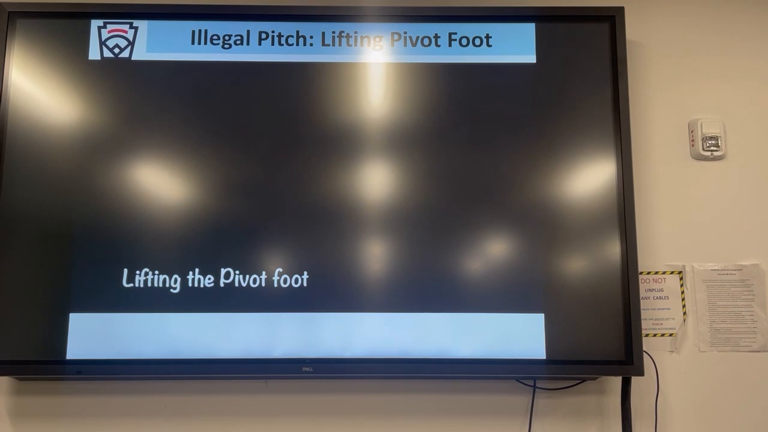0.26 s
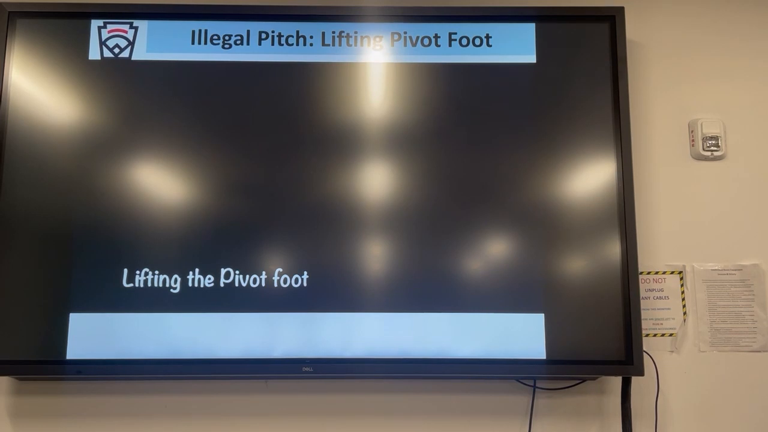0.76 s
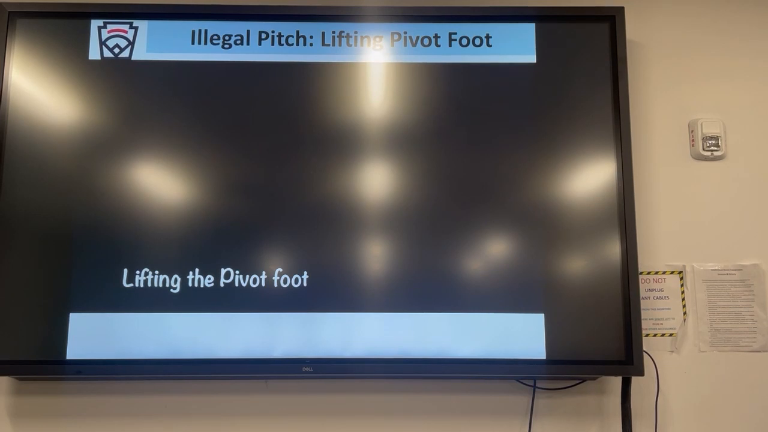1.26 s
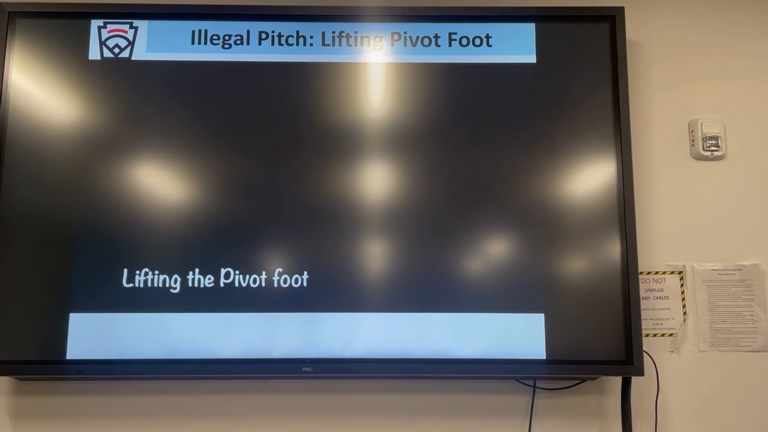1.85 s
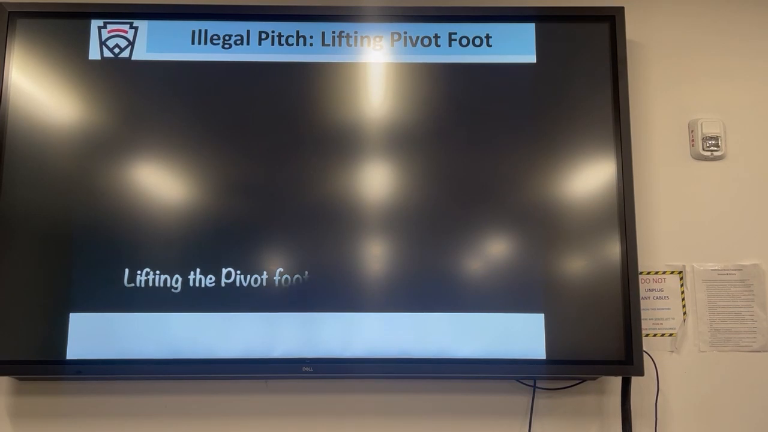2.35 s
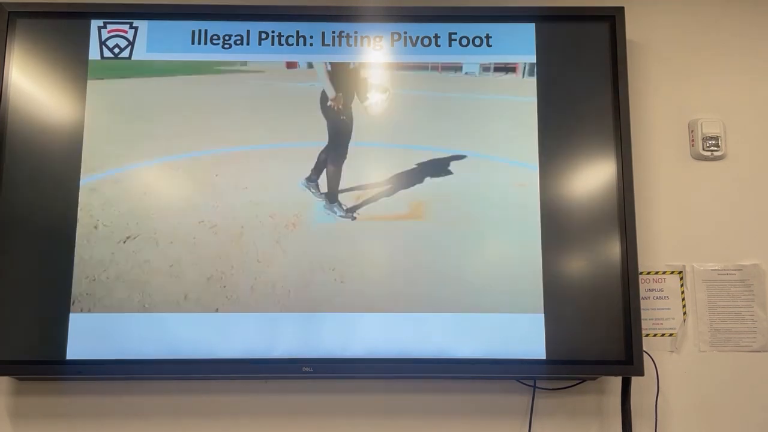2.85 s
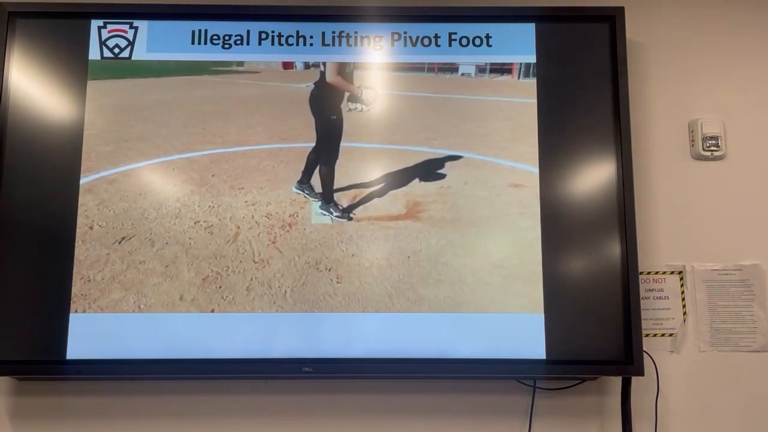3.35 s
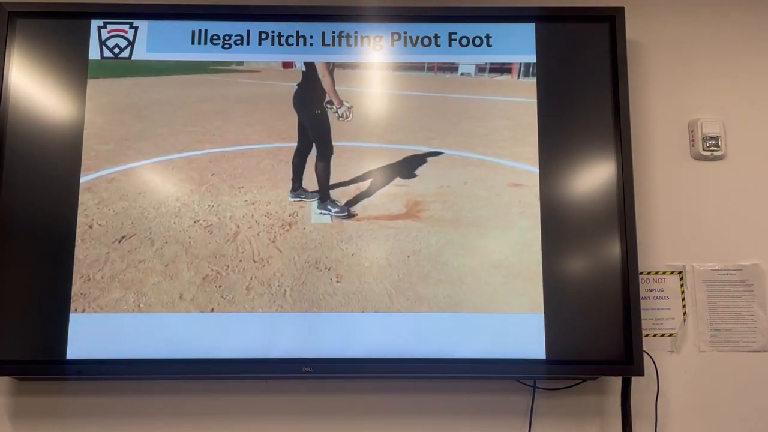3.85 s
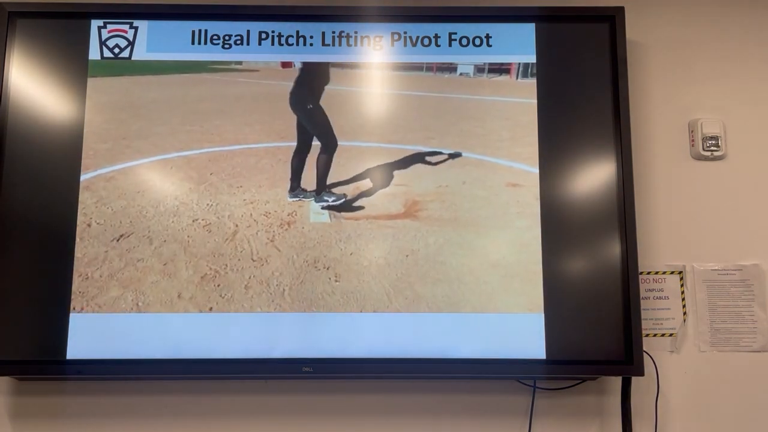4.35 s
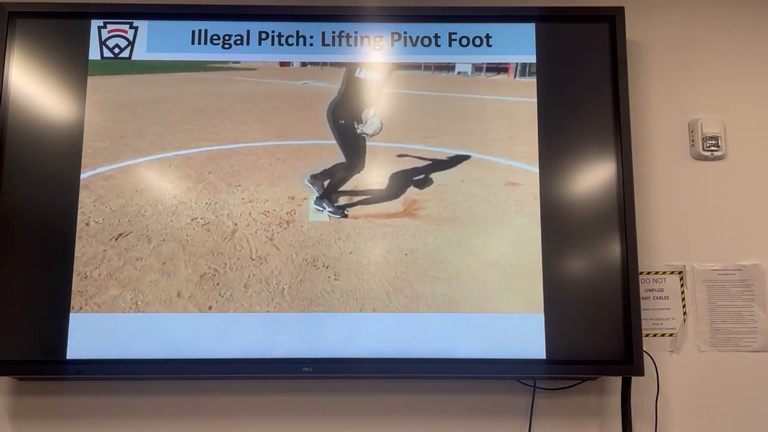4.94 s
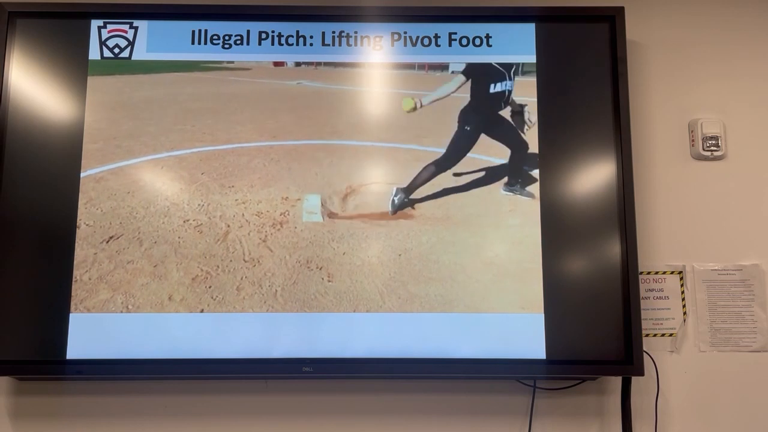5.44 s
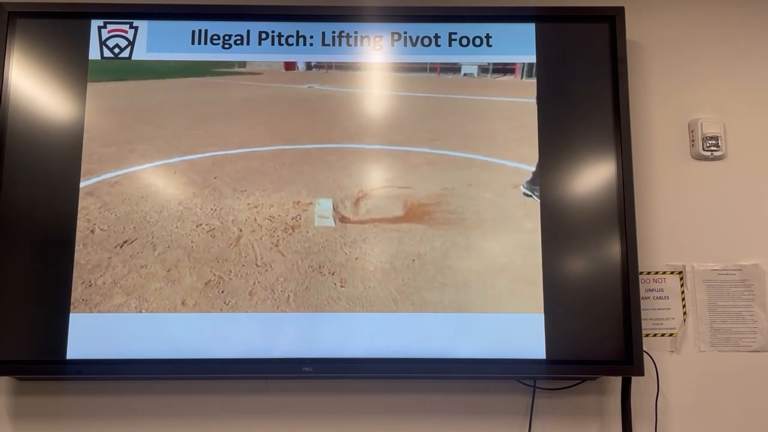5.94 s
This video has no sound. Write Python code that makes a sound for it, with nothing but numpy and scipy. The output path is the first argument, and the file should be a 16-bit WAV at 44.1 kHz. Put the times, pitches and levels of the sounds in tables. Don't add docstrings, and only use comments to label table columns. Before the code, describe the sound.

A quiet indoor meeting room heard through a hand-held phone. A deep, even duct rumble and fan motor hum dominate throughout, with very faint vent hiss above. Tiny rapid ticks from the phone's lens drive buzz softly, and a sleeve rustles faintly, mostly in the first two seconds. Small dry clicks come near 0.9, 1.5 and 1.8 seconds, and a very faint one at 5.5. The pitching clip on the screen makes no sound.

```python
import sys
import numpy as np
from scipy import signal
from scipy.fft import rfft, irfft, next_fast_len
from scipy.io import wavfile

SR = 44100
rng = np.random.default_rng(int(sys.argv[2]) if len(sys.argv) > 2 else 0)


def inscribe(sig):
    pcm = np.round(np.clip(np.atleast_2d(sig).T, -1, 1) * 32767)
    wavfile.write(sys.argv[1], SR, pcm.astype(np.int16))


def decibels_to_gain(level_db):
    exponent = np.asarray(level_db, float) / 20
    return 10 ** exponent


N = 272714
SIZE = next_fast_len(N + SR)
TIME = np.arange(SIZE) / SR
HZ = np.maximum(np.fft.rfftfreq(SIZE, 1 / SR), 1)
MOTOR_HZ = 57.35


def at_hz(points, column=1):
    points = np.array(points)
    return np.interp(np.log(HZ), np.log(points[:, 0]), points[:, column])


def peaks(modes):
    return sum(decibels_to_gain(2 * db) / (1 + ((HZ - hz) / width) ** 2) ** 2 for hz, width, db in modes)


def drift(rate_hz):
    spectrum = rfft(rng.standard_normal(SIZE))
    slow = irfft(spectrum / (1 + (HZ / rate_hz) ** 2), SIZE)
    return (slow - slow.mean()) / slow.std()


def noises(power):
    white = rfft(rng.standard_normal((2, SIZE)))
    return irfft(white * np.sqrt(power * SR / 2), SIZE)


def ring(clicks, hz, t60):
    radius = decibels_to_gain(-60 / (t60 * SR))
    angle = 2 * np.pi * hz / SR
    poles = [1, -2 * radius * np.cos(angle), radius * radius]
    return signal.lfilter([0, np.sin(angle)], poles, clicks + 1e-18)


def train(times, sizes):
    out = np.zeros(SIZE, np.asarray(sizes).dtype)
    np.add.at(out, np.round(np.multiply(times, SR)).astype(int), sizes)
    return out


# (f/Hz, level/dB per Hz)
RUMBLE = [(16, -100), (24, -86), (30, -79.5), (46, -69.5), (100, -73.5), (150, -78.5), (205, -77.5),
          (270, -84.5), (400, -85.5), (600, -92), (900, -96.5), (1200, -102), (1700, -110), (6000, -160)]
# (f/Hz, width/Hz, peak level/dB per Hz)
ROOM_MODES = [(39.7, 3.8, -64), (54.4, 5.8, -61.5), (69.7, 1.3, -64.5), (79.2, 11, -60), (116, 8.9, -63),
              (134.7, 9.3, -61), (159.7, 11, -65), (170.6, 11, -62.5), (190.6, 6, -65), (207.7, 2.5, -66.5),
              (239, 23, -78.5), (255, 8.3, -80), (291, 16, -76.5), (338, 16, -79), (401, 8.1, -84),
              (440.3, 7.2, -84)]
# (f/Hz, level/dB per Hz)
HISS = [(900, -125), (1500, -115), (2300, -112), (2900, -117), (4500, -122), (6000, -125.5), (7200, -125.5),
        (7800, -122), (8400, -127), (8900, -125), (9500, -128), (11200, -131), (12000, -136), (12500, -142)]
# (f/Hz, width/Hz, peak level/dB per Hz)
WHISTLES = [(2480, 12, -102), (2283, 12, -105), (2024, 9.5, -108), (2150, 7.1, -105), (2750, 20, -112),
            (2890, 6.9, -111), (3290, 17, -114), (1233, 11, -104), (1466, 7.2, -107), (1684, 9.4, -109),
            (4670, 160, -120), (6000, 14, -121), (7060, 8.1, -122), (7440, 18, -121)]


def ventilation():
    rumble = noises(decibels_to_gain(2 * at_hz(RUMBLE)) + peaks(ROOM_MODES))
    turn = 2 * np.pi * MOTOR_HZ * TIME
    throb = 1 + 0.08 * (np.cos(turn) + 0.69 * np.cos(2 * turn))
    hiss = throb * noises(decibels_to_gain(2 * at_hz(HISS)))
    whistles = decibels_to_gain(1.6 * drift(5.8)) * noises(peaks(WHISTLES))
    return rumble + hiss + whistles


# (multiple of the turning rate, level/dB rms, left lead/rad)
HUM = [(1, -45, 0.24), (2, -48.5, 0.33), (3, -60.5, 0.45), (4, -65, 0.18), (5, -59, 0.092), (6, -65, 0.058),
       (7, -74.5, 0.2), (8, -87, 0.4), (9, -81, 0.39), (10, -86.5, 0.26), (11, -88.5, 0.35)]


def motor(wobble_db=0.6, wander_rad=0.06):
    turn = 2 * np.pi * MOTOR_HZ * TIME + wander_rad * drift(0.5)
    out = np.zeros((2, SIZE))
    for k, db, lead in HUM:
        dispersion = -0.6 * k ** 2
        phase = k * turn + dispersion - np.pi / 2 + lead * np.array([[0.5], [-0.5]])
        out += np.sqrt(2) * decibels_to_gain(db + wobble_db * drift(0.47)) * np.sin(phase)
    return out[:, :N]


# (f/Hz, level/dB per Hz)
RUSTLE_BODY = [(600, -45.5), (1300, -0.5), (2300, 8.5), (3500, 3), (5000, -2), (7500, -6), (9500, -41.5)]
# (f/Hz, level/dB per Hz)
RUSTLE_EDGE = [(4500, -44), (6400, -15), (7600, -15), (8400, -28.5), (9300, -9), (10500, -12), (11400, -11),
               (12400, -36)]
# (middle t/s, length t/s, level/dB, edge re body level/dB)
STROKES = [(0.086, 0.26, -76.5, -12.5), (0.45, 0.42, -81.5, -8.5), (0.642, 0.075, -82, -20),
           (0.85, 0.42, -80.5, -8.5), (1.017, 0.29, -83.5, -12), (1.23, 0.19, -82, -9),
           (1.5, 0.29, -86.5, -3.5), (1.725, 0.22, -78, -8), (1.9, 0.1, -81, -13), (1.957, .07, -83.5, -17),
           (2.352, 0.13, -95, -1), (2.66, 0.08, -88.5, -4), (2.83, 0.35, -81, -16.5),
           (2.883, 0.049, -83, -9), (3.356, 0.074, -82, -5.5), (3.43, 0.17, -83, -17),
           (3.544, .06, -84, -9), (3.88, 0.097, -94, 1), (4.154, 0.32, -88.5, -4.5),
           (4.407, 0.37, -86.5, -10), (4.843, 0.052, -98, 7), (5.02, 0.054, -98, 4), (5.21, 0.095, -91, -2),
           (5.552, 0.051, -84.5, -3), (5.656, 0.054, -99, -11), (5.82, .05, -94, -6),
           (5.76, .06, -90.5, -1), (5.886, 0.1, -88, -10), (6.06, 0.077, -86, -7)]
REST_DB, REST_BRIGHT_DB = -91, -12


def sleeves(grain_db=1.6):
    middle, length, db, bright_db = np.transpose(STROKES)[:, :, None]
    coarse = TIME[::64]
    swell = np.exp(-((coarse - middle) / (0.5 * length)) ** 2)

    def rub(colour, stroke_db, rest_db, trim_db):
        cloth = noises(decibels_to_gain(2 * at_hz(colour)))
        power = decibels_to_gain(2 * rest_db) + np.sum(decibels_to_gain(2 * stroke_db) * swell ** 2, axis=0)
        envelope = np.interp(TIME, coarse, np.sqrt(power))
        return cloth / cloth.std() * envelope * decibels_to_gain(trim_db + grain_db * drift(23))

    body = rub(RUSTLE_BODY, db, REST_DB, 2.5)
    edge = rub(RUSTLE_EDGE, db + bright_db, REST_DB + REST_BRIGHT_DB, 2.2)
    return body + edge


# (t/s, peak level/dB, low mode f/Hz, high mode f/Hz, ring T60 t/s)
CLICKS = [(0.9127, -46, 2970, 5650, 0.002), (0.918, -54.5, 1900, 4530, 0.0025),
          (1.468, -61.5, 4530, 10100, 0.005), (0.9355, -60, 2650, 4800, 0.0044),
          (0.944, -65, 2900, 3600, 0.004), (1.757, -55, 1170, 1400, 0.016), (1.867, -62, 6900, 6000, 0.003),
          (1.8685, -52, 2250, 3900, 0.0085), (1.881, -66, 4300, 3600, 0.006),
          (1.8845, -67, 3800, 2200, 0.006), (5.545, -68.5, 4020, 6760, 0.004)]
ROOM_DB, ROOM_T60_S = -32.5, 0.34


def clicks(snap_db=-2.0):
    out = np.zeros((2, SIZE))
    t = np.arange(SR // 2) / SR
    for s, db, low_hz, high_hz, t60 in CLICKS:
        hit = train([s], [decibels_to_gain(db)])
        band = [low_hz / 2, min(high_hz * 3.0, 15000)]
        snap = signal.sosfilt(signal.butter(1, band, "band", fs=SR, output="sos"), hit)
        modes = ring(hit, low_hz, t60) - 0.65 * ring(hit, high_hz, t60)
        direct = modes + decibels_to_gain(snap_db) * snap
        decay = decibels_to_gain(ROOM_DB - 60 * t / ROOM_T60_S) * (t > 0.004)
        tail = rng.standard_normal((2, len(t))) * decay
        out += direct * [[1], [0]]
        out += signal.oaconvolve(direct[None], tail, axes=1)[:, :SIZE]
    return out


# (f/Hz, likeness 0-1, left lead/rad, left-right level/dB)
PAIR = [(35, .99, .33, -.4), (55, .995, .42, -.3), (150, .995, .41, -.8), (280, .97, .2, .1),
        (430, .87, .27, .8), (600, .6, .5, .9), (900, .3, .45, -.9), (1400, .82, .15, -.5),
        (2200, .93, -.15, -.9), (3200, .86, -.58, -1.7), (5400, .72, -.95, -2.0), (6300, .66, -.6, -1.5),
        (7100, .62, -.75, -1.5), (7400, .1, -1.8, -1.7), (7700, .77, -2.8, -1.4), (8600, .79, -2.8, .1),
        (9400, .8, -2.0, 0), (10500, .97, -.05, 0), (11100, .93, .15, 0), (12400, .45, 2.2, .1)]


def ports(shared_and_own):
    shared, own = rfft(shared_and_own)
    alike = at_hz(PAIR)
    lead = at_hz(PAIR, column=2)
    tilt = decibels_to_gain(at_hz(PAIR, column=3) / 2)
    common = np.sqrt((1 + alike) / 2) * shared
    apart = np.sqrt((1 - alike) / 2) * own
    turn = np.exp(0.5j * lead) * tilt
    return irfft([(common + apart) * turn, (common - apart) / turn], SIZE)[:, :N]


# (f/Hz, width/Hz, peak level/dB per Hz)
LENS_BUZZ = [(731, 29, -94)]
# (t/s, level/dB)
FIRM_STEPS = [(0.014, -57), (0.114, -57), (0.181, -54.5), (0.381, -57), (0.448, -55.5), (0.481, -60),
              (0.515, -54), (0.548, -61), (0.848, -53.5), (0.915, -55.5), (1.115, -57.5), (1.182, -52),
              (1.315, -64), (1.515, -56), (1.715, -57), (1.849, -58), (1.982, -60), (2.016, -57),
              (2.116, -61), (2.182, -56), (2.249, -61), (2.316, -55.5), (2.349, -61), (2.382, -59),
              (2.449, -60), (2.516, -53), (2.583, -60), (2.683, -59), (2.849, -53.5), (3.016, -63),
              (3.183, -52), (3.316, -54.5), (3.35, -57), (3.45, -57.5), (3.517, -59), (3.85, -58),
              (3.917, -56), (4.017, -61), (4.084, -59), (4.184, -52.5), (4.317, -56), (4.35, -60),
              (4.384, -64), (4.45, -62), (4.517, -51), (4.651, -57), (4.684, -52), (4.851, -58),
              (4.917, -56), (4.984, -59), (5.051, -53.5), (5.184, -57), (5.251, -61.5), (5.351, -56),
              (5.451, -56), (5.518, -55.5), (5.618, -62), (5.718, -59), (5.851, -56), (6.118, -61)]
FRAME_HZ, FIRST_FRAME_S = 29.98, 0.0142
FOCUS_EVERY, FIRST_FOCUS = 2, 1
FOCUS_DB, HOLD_DB, STEP_SPREAD_DB, FIRM_TRIM_DB = -62.5, -66, 1.5, 0.5


def lens(hz=722, t60=0.045, push_s=0.004):
    frames = np.arange(int((N / SR - FIRST_FRAME_S) * FRAME_HZ) + 1)
    focusing = (frames - FIRST_FOCUS) % FOCUS_EVERY == 0
    light_db = np.where(focusing, FOCUS_DB, HOLD_DB)
    sizes = decibels_to_gain(light_db + STEP_SPREAD_DB * rng.standard_normal(len(frames)))
    s, db = np.transpose(FIRM_STEPS)
    firm = np.round((s - FIRST_FRAME_S) * FRAME_HZ).astype(int)
    sizes[firm] = decibels_to_gain(db + FIRM_TRIM_DB)
    phases = np.exp(2j * np.pi * rng.random(len(sizes)))
    steps = train(FIRST_FRAME_S + frames / FRAME_HZ, sizes * phases)

    t = np.arange(SR // 10) / SR
    swell = (1 - np.exp(-t / push_s)) * decibels_to_gain(-60 * t / t60)
    mode = swell / swell.max() * np.exp(2j * np.pi * hz * t)
    swing = signal.oaconvolve(steps, mode)[:N]
    swing = swing + signal.hilbert(noises(peaks(LENS_BUZZ))[0])[:N]
    return np.real(swing * np.exp([[0.61j], [-0.61j]]))


def scene():
    room = ventilation() + sleeves() + clicks()
    return ports(room) + motor() + lens()


def low_pass(x):
    return signal.sosfilt(signal.butter(12, 12400, fs=SR, output="sos"), x)


def record(dry):
    to_end = TIME[N - 1::-1] + 0.0012
    fade = np.clip(np.minimum(TIME[:N], to_end) / 0.004, 0, 1)
    mix = dry * np.sin(fade * np.pi / 2) ** 2
    return low_pass(mix)


dry = scene()
out = record(dry)
inscribe(out)
```